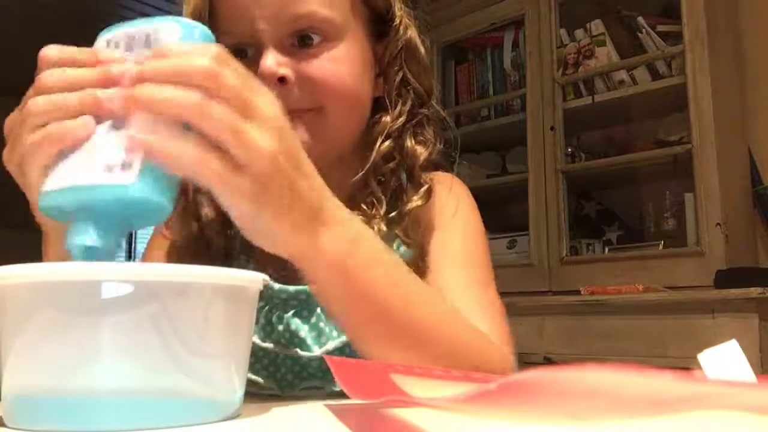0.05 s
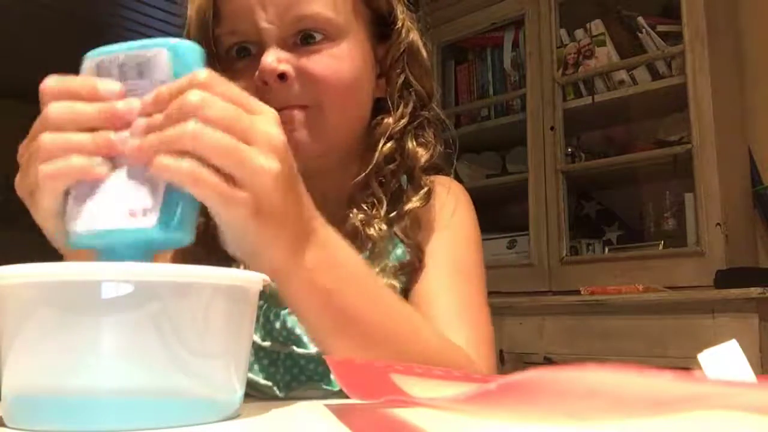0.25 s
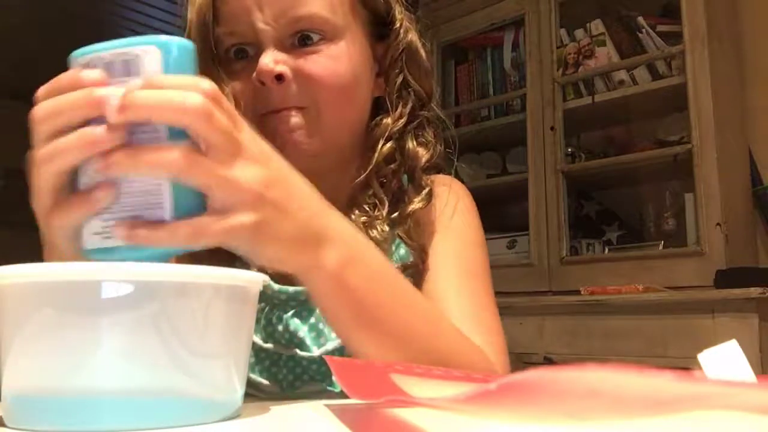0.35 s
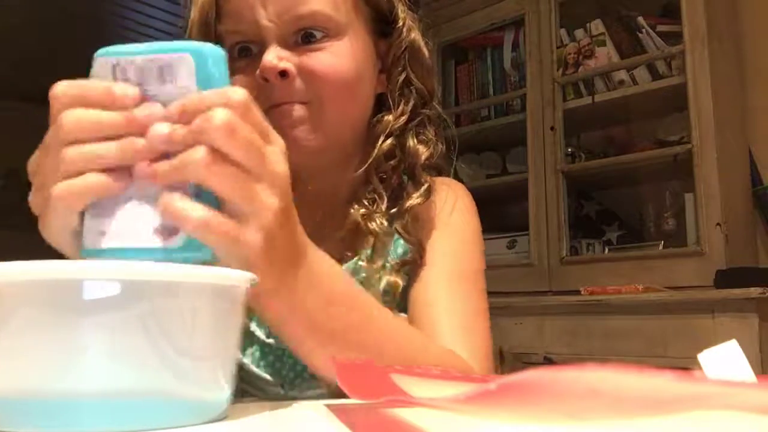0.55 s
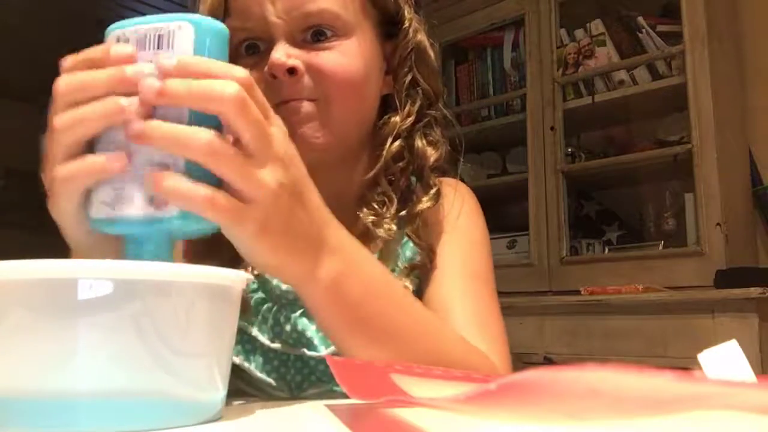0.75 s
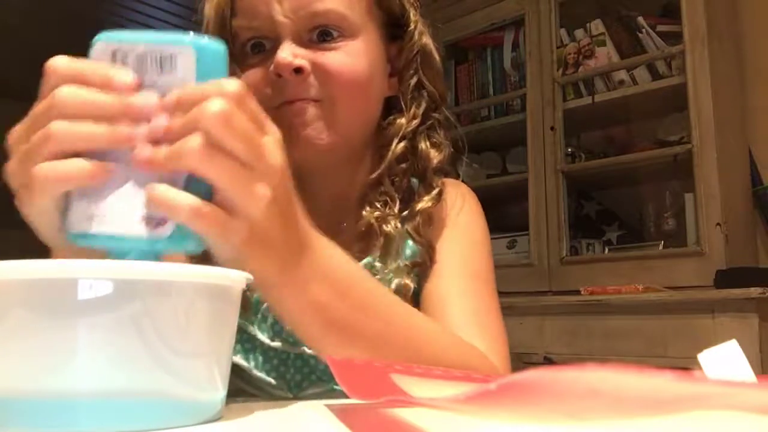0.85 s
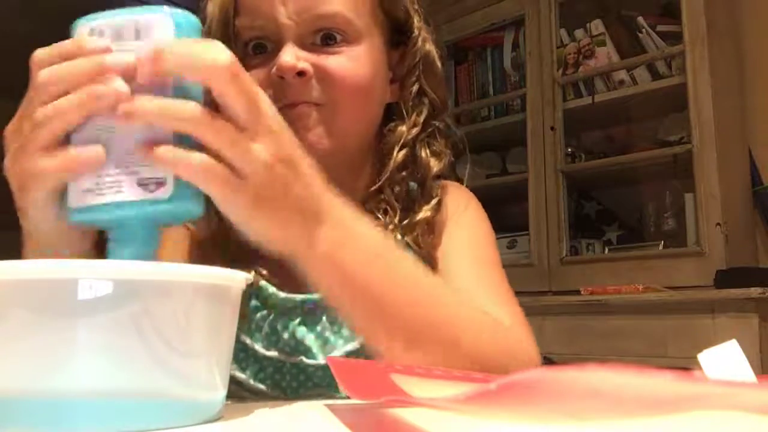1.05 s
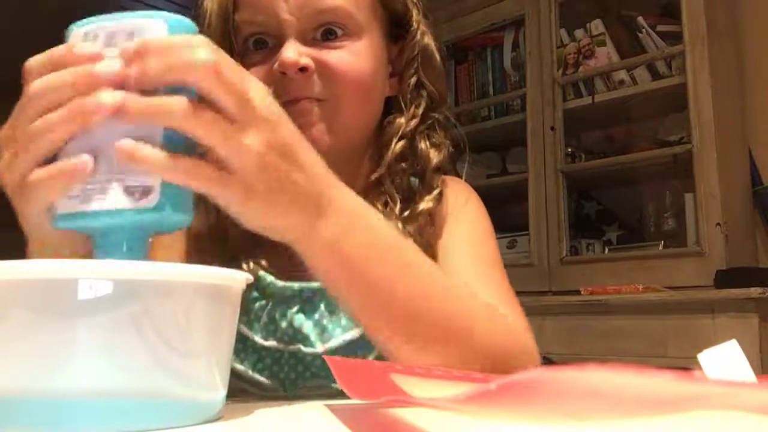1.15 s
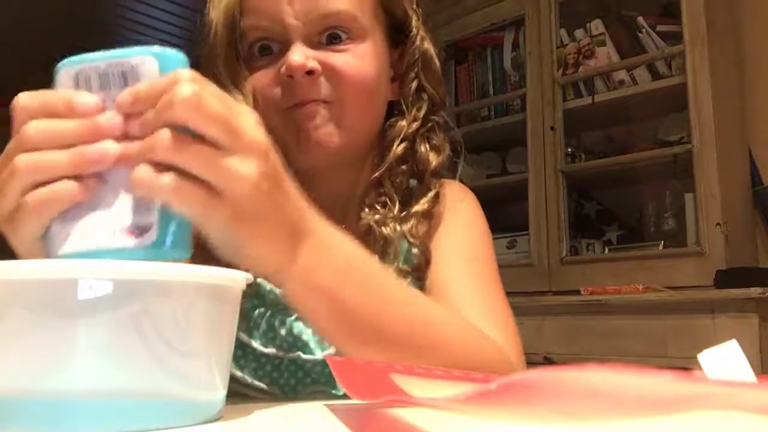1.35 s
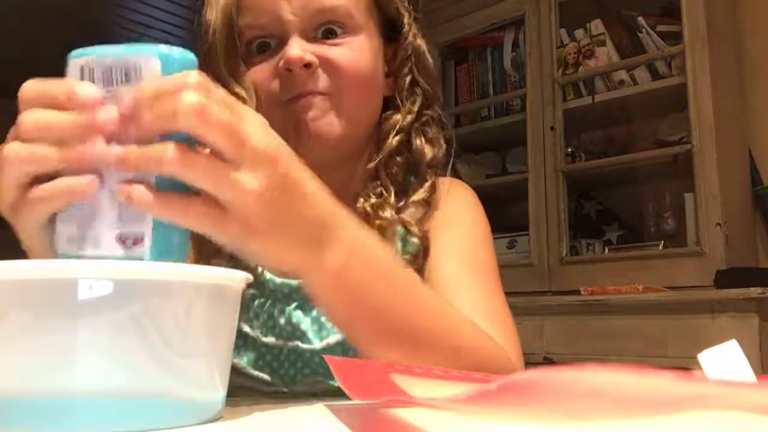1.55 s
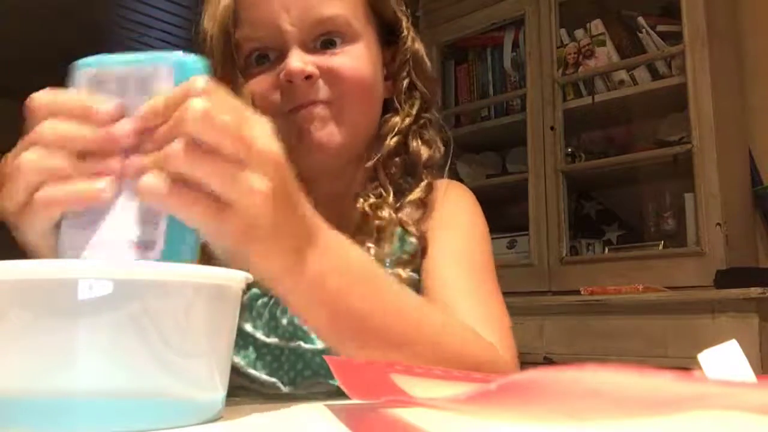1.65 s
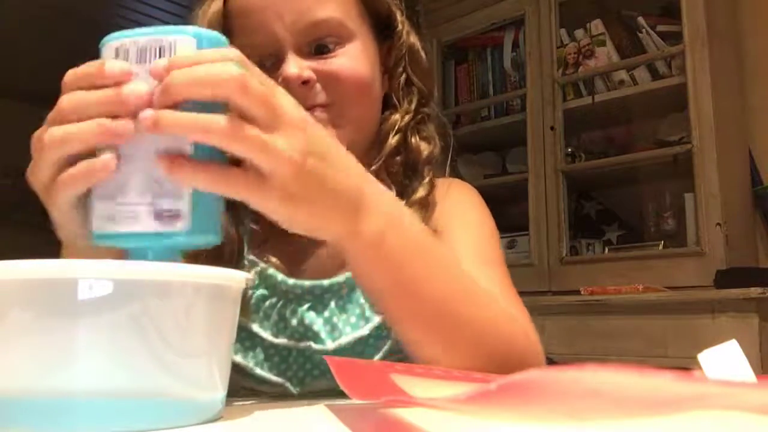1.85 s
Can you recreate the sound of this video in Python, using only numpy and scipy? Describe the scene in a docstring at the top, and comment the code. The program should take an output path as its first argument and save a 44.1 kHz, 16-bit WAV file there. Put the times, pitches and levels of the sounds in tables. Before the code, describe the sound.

Squeaky puffs and wet spits from a plastic squeeze bottle pumped over a bowl.

```python
"""A nearly empty plastic bottle of thick liquid, pumped upside down over a bowl, close by.
Each squeeze drives a swelling hiss through the wet nozzle until a blob spits out with pops and a thump.
Each release sucks air back in and the wall springs back.
Bottle and bowl ring low; the quiet room adds a short tail."""
import sys
import numpy as np
from scipy import signal
from scipy.fft import rfft, irfft
from scipy.io import wavfile
from scipy.ndimage import uniform_filter1d, minimum_filter1d

SR = 44100
rng = np.random.default_rng(int(sys.argv[2]) if len(sys.argv) > 2 else 0)


def transcribe(u):
    """Save the signal u as a 16-bit wav file named by the first command-line argument.

    u: samples, shape (n,) or (channels, n), limited to [-1, 1]; the rate is SR.
    q: integer samples, one column per channel.
    """
    v = np.clip(np.atleast_2d(u).T, -1, 1)
    q = np.round(v * 32767).astype(np.int16)
    wavfile.write(sys.argv[1], SR, q)


N = 83790

# nozzle hiss spectrum: (frequency [Hz], gain [dB])
HISS_SPECTRUM = [(2800, -17), (3300, -4), (3900, -1), (4500, 3.5), (5100, -2.5), (5700, 3.5), (7400, -2.5),
                 (8500, -15), (11000, -29)]
# liquid films bursting: (time [s], pitch [Hz], peak [dB], rise [ms], spray [dB])
FILM_POPS = [ (.4110, 777, -7, 1.97, -50), (0.4462, 1210, -7.5, 1.13, -33), (0.451, 972, -4.5, 1.02, -47),
             (0.7823, 1020, -5, 0.39, -34.5), (0.789, 1250, -14, 0.8, -50), (.8028, 920, -7.5, 1.22, -27.5),
             (0.9693, 1147, -4.5, 0.79, -32), (1.1645, 917, -11, 1.45, -43),
             (1.5403, 1220, -14.5, 1.9, -30), (1.5443, 1350, -9.5, 1.36, -52), (1.5476, 935, -5, 1.4, -56),
             (1.7214, 1205, -18, 1.05, -49)]
# hollow body of the outward jet: (frequency [Hz], gain [dB])
OUTFLOW_SPECTRUM = [(150, -7.5), (330, -12), (530, -10), (880, -4.5), (1250, 5), (1750, -13.5), (2300, -13),
                    (2700, -42), (4000, -62)]


def undb(db):
    """Decibels to gain."""
    return 10 ** (np.asarray(db) / 20)


def unit(x):
    """Scale to rms 1."""
    return x / np.sqrt(np.mean(x ** 2))


def colour(x, spectrum):
    """Filter by a curve of (frequency [Hz], gain [dB])."""
    hz, db = np.array(spectrum, float).T
    bins_hz = np.maximum(np.fft.rfftfreq(len(x), 1 / SR), 1)
    return irfft(rfft(x) * undb(np.interp(np.log(bins_hz), np.log(hz), db)), len(x))


def air(spectrum):
    """Turbulence: coloured noise, rms 1."""
    return unit(colour(rng.standard_normal(N), spectrum))


def butter(x, hz, kind):
    """Second-order causal filter."""
    return signal.sosfilt(signal.butter(2, hz, kind, fs=SR, output="sos"), x)


def bursts(t, events, shape, glide_per_s=0):
    """Tones that swell and die in a few cycles; a higher shape shortens them."""
    out = np.zeros(N)
    for at_s, hz, peak_db, rise_ms, *_ in events:
        age = t - at_s
        growth = np.maximum(1 + age / (rise_ms * 1e-3), 0)
        swing = np.sin(2 * np.pi * hz * age * (1 + glide_per_s * age / 2))
        out += undb(peak_db) * (growth * np.exp(1 - growth)) ** shape * swing
    return out


def background(level_db=-47.5):
    """Faint, steady room noise, mostly bass."""
    # (frequency [Hz], gain [dB])
    floor_spectrum = [(25, -46), (40, -37), (57, 7.5), (85, -8.5), (122, -1.5), (160, -10), (220, -4),
                      (360, -6.5), (550, -17), (1050, -15.5), (1700, -25.5), (2900, -33), (4500, -32),
                      (6500, -34.5), (9000, -42.5), (16000, -49)]
    return undb(level_db) * air(floor_spectrum)


def froth(bubbles_per_s=2800, low_hz=3000, high_hz=16000, decay_cycles=16):
    """Tiny bubbles burst in the nozzle, each a short ping; rms 1."""
    age = np.arange(1024) / SR
    out = np.zeros(N + len(age))
    for when, pitch, weakness in rng.random((int(bubbles_per_s * N / SR), 3)):
        hz = low_hz * (high_hz / low_hz) ** pitch
        cycles, start = hz * age, int(when * N)
        ping = np.sin(2 * np.pi * cycles) * np.exp(-cycles / decay_cycles)
        out[start:start + len(age)] += undb(-2.5 * np.log(.04 + weakness)) * hz * ping
    return unit(out[:N])


def wet_nozzle(x, spectrum, ripple_db=2.8, step_hz=260):
    """Colour x, adding chance resonances of the liquid lining the nozzle; rms 1."""
    grid_hz = np.arange(1, 80) * step_hz
    gains_db = ripple_db * rng.standard_normal(len(grid_hz)) * np.minimum(grid_hz / 4000, 1)
    return unit(colour(colour(x, spectrum), np.c_[grid_hz, gains_db]))


def whistle(age, rise_s, hold_s, hz, glide_per_s=1.5, width_hz=450, build_db=9):
    """The nozzle half whistles: a narrow noise band rising in pitch and level."""
    pitch_hz = hz * (1 + glide_per_s * np.clip(age - rise_s, -rise_s, hold_s))
    waver = butter(rng.standard_normal(N) + 1j * rng.standard_normal(N), width_hz / 2, "low")
    tone = unit(np.real(waver * np.exp(2j * np.pi * np.cumsum(pitch_hz) / SR)))
    return tone * undb(np.interp(age, [0, rise_s + hold_s], [-build_db, 0]))


def puffs(t, strokes, body_spectrum, onset_s=0.003, cutoff_s=0.0032, sputter_db=2.4, rumble_db=-48.5):
    """Air through the wet nozzle swells, froths, sputters and is cut off."""
    # top and bottom bands of the jet: (frequency [Hz], gain [dB])
    fizz_spectrum = [(6000, -110), (8200, -7), (9600, 0), (10500, -4), (11400, 3.5), (13000, 2.5),
                     (14200, -0.5), (15500, -6.5)]
    rumble_spectrum = [(25, -39), (60, -3), (110, 8.5), (170, -9), (300, -14), (800, -72)]
    out, bubbles = np.zeros(N), froth()
    for start_s, rise_s, hold_s, swell_db, sag_db, body_db, hiss_db, fizz_db, hz, whistle_db in strokes:
        age = t - start_s
        flow_db = np.interp(age, [0, rise_s, rise_s + hold_s], [-swell_db, 0, -sag_db])
        gate = np.exp(np.minimum(age, 0) / onset_s - np.maximum(age - rise_s - hold_s, 0) / cutoff_s)
        flutter = unit(butter(rng.standard_normal(N), 220, "low"))
        sputter = unit(undb(sputter_db * flutter))
        bright = undb(whistle_db) * whistle(age, rise_s, hold_s, hz)
        frothy_air = bubbles + rng.standard_normal(N)
        bright += undb(hiss_db) * wet_nozzle(frothy_air, HISS_SPECTRUM)
        bright += undb(fizz_db) * wet_nozzle(frothy_air, fizz_spectrum)
        hollow = undb(body_db) * air(body_spectrum) + undb(rumble_db) * air(rumble_spectrum)
        out += gate * sputter * (undb(flow_db) * bright + undb(0.61 * flow_db) * hollow)
    return out


def intakes(t):
    """Each release sucks air back through the nozzle."""
    # (start [s], rise [s], hold [s], swell [dB], sag [dB], body [dB], hiss [dB], fizz [dB],
    #  whistle [Hz], whistle [dB])
    strokes = [ (0.178, 0.036, .010, 19.2, 1.5, -29, -29.5, -36, 5816, -32.5),
               (.598, .007, .027, 25.3, 0.73, -25.5, -29, -27.5, 6500, -26),
               (0.937, .019, 0.014, 29, 1.7, -26.5, -27, -24.5, 7540, -32.5),
               (1.32, 0.033, 0.018, 26.6, 10.5, -23, -25, -26.5, 5550, -41),
               (1.688, 0.021, 0.015, 23, 6.2, -25, -33, -30.5, 4450, -40)]
    # hollow body of the inward jet: (frequency [Hz], gain [dB])
    inflow_spectrum = [(150, -20.5), (330, -12.5), (530, -21.5), (900, -1.5), (1300, 0.5), (1750, -11.5),
                       (2350, -6), (2700, -24), (4000, -78)]
    return puffs(t, strokes, inflow_spectrum)


def gurgles(t):
    """Thick liquid murmurs in the neck as pressure builds."""
    # (time [s], half-width [s], level [dB])
    murmurs = [(0.411, 0.004, -28), (0.755, 0.012, -39.5), (1.12, 0.0085, -47), (1.491, 0.0094, -40),
               (1.520, .003, -30), (1.87, 0.012, -45.5)]
    envelope = sum(undb(db) * np.exp(-((t - at_s) / width_s) ** 2) for at_s, width_s, db in murmurs)
    return air(OUTFLOW_SPECTRUM) * envelope


def thumps(t):
    """A blob leaves the nozzle; an air pocket opens and swings."""
    # (time [s], pitch [Hz], peak [dB], rise [ms])
    blobs = [(0.4109, 238, -13, 1.23), (.4470, 285, -17, 5.7), (0.452, 308, -3.5, 2.5),
             (.8045, 278, -4, 1.9), (0.97, 324, -22.5, 1.26), (1.159, 237, -19, 4.2),
             (1.1655, 265, -9, 1.35), (1.1667, 134, -9.5, 2.2), (1.543, 266, -17, 5),
             (1.5480, 285, -4, 2.22)]
    return bursts(t, blobs, shape=1.78)


def pops(t):
    """Liquid films burst at the nozzle, gliding slightly upward."""
    return bursts(t, FILM_POPS, shape=1.53, glide_per_s=5.2)


def sprays(t, width_s=.0015):
    """Each bursting film throws a snap of spray."""
    envelope = sum(undb(db) * np.exp(-((t - at_s) / width_s) ** 2) for at_s, *_, db in FILM_POPS)
    return air(HISS_SPECTRUM) * envelope


def squeezes(t):
    """Each squeeze pushes air out through the nozzle."""
    # (start [s], rise [s], hold [s], swell [dB], sag [dB], body [dB], hiss [dB], fizz [dB],
    #  whistle [Hz], whistle [dB])
    strokes = [ (0.415, 0.018, .014, 11.5, -1.5, -21.5, -28.5, -36, 4500, -25.5),
               (0.755, 0.029, 0.02, 26.5, 9, -24, -27, -33.5, 5020, -25.5),
               (1.124, 0.031, 0.0077, 20.5, 1.5, -29, -28.5, -30.5, 5480, -26.5),
               (1.501, 0.04, .007, 21, 12, -28.5, -31.5, -32.5, 4600, -34),
               (1.873, 0.02, 0.021, 36.5, 7, -26, -29.5, -33, 5970, -54)]
    return puffs(t, strokes, OUTFLOW_SPECTRUM)


def wall_flexes(t):
    """The plastic wall springs back on release."""
    # (time [s], pitch [Hz], peak [dB], rise [ms])
    flexes = [(0.613, 104, -46, 6.3), (0.951, 91, -28.5, 4.7), (1.342, 104.4, -20, 3.7),
              (1.705, 110, -27, 4.5)]
    return bursts(t, flexes, shape=2.3)


def ring(t, x):
    """Bottle and bowl ring in damped modes driven by x."""
    # (frequency [Hz], relative level [dB], t60 [s])
    modes = [(124.9, -31, 0.18), (193.4, -41, 0.39), (222.8, -34.5, 0.34), (306, -74, 0.12),
             (330, -55, 0.44), (366.5, -59, 0.19), (600, -77, .2), (723, -36, 0.27), (926.5, -46, 0.05),
             (1050, -37, 0.17), (1240, -76, .22), (1340, -86, 0.15), (1918, -56, 0.33), (2177, -49, 0.24),
             (4160, -59, 0.23), (4150, -73, .3), (5473, -55, 1), (5960, -42, 0.14), (6602, -58, 0.39),
             (7017, -53, 0.54)]
    response = sum(undb(db) * np.sin(2 * np.pi * hz * t) * undb(-60 * t / t60) for hz, db, t60 in modes)
    return signal.fftconvolve(x, response)[:N] / 20


def echoes(t, x, top_hz=1620):
    """Dull, distinct reflections off nearby walls and a cupboard."""
    # (delay [s], level [dB])
    reflections = [(.011, -20.5), (0.033, -22.5), (.039, -28), (.057, -29)]
    dull = butter(x, top_hz, "low")
    return sum(undb(db) * np.interp(t - delay_s, t, dull, left=0) for delay_s, db in reflections)


def room(t, x, build_s=0.002, early_s=0.002, early_db=-9.5):
    """Quick reflections off table and hands, then a diffuse tail whose treble dies sooner."""
    # (frequency [Hz], gain [dB])
    tail_spectrum = [(60, -28), (150, -18), (300, -11.5), (520, -15.5), (1100, -14.5), (1700, -14.5),
                     (2400, -10), (3300, -7.5), (4500, -16), (5550, -9.5), (6400, -13), (7300, -7.5),
                     (9000, -10), (15000, -20)]
    noise = colour(rng.standard_normal(N), tail_spectrum)
    low = colour(noise, [(1000, 0), (3000, -30)])
    high = colour(noise, [(6500, -30), (10000, 0)])
    tail = 0
    for band, t60_s in (low, 0.43), (noise - low - high, 0.43), (high, 0.33):
        fade = undb(-60 * t / t60_s) * (1 - np.exp(-t / build_s))
        tail += band * fade / np.linalg.norm(fade)
    early = rng.standard_normal(N) * np.exp(-t / early_s) * (1 - np.exp(-t / early_s))
    return signal.fftconvolve(x, tail + undb(early_db) * early / np.linalg.norm(early))[:N]


def scene():
    """The pumped bottle, its ring and the room; mono."""
    # hollow dip in the hiss: (frequency [Hz], gain [dB])
    nozzle_notch = [(2450, -0.5), (2750, -10), (2980, 0.5), (3300, -2)]
    t = np.arange(N) / SR
    nozzle = squeezes(t) + intakes(t) + gurgles(t) + sprays(t)
    bottle = colour(nozzle, nozzle_notch) + thumps(t) + pops(t) + wall_flexes(t)
    return (bottle + ring(t, bottle) + echoes(t, bottle) + room(t, bottle) + background())[None]


def record(dry, low_cut_hz=45, ceiling=.97, top_hz=15900):
    """Bass cut, smooth peak limiter, steep top cut."""
    x = butter(butter(dry, low_cut_hz, "high"), low_cut_hz, "high")
    held_gain = minimum_filter1d(ceiling / np.maximum(abs(x), ceiling), size=260)
    limited = x * uniform_filter1d(held_gain, size=220)
    return signal.sosfilt(signal.ellip(10, .1, 90, top_hz, fs=SR, output="sos"), limited)


dry = scene()
out = record(dry)
transcribe(out)
```